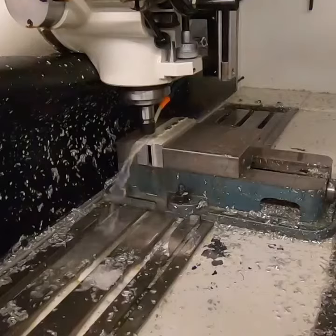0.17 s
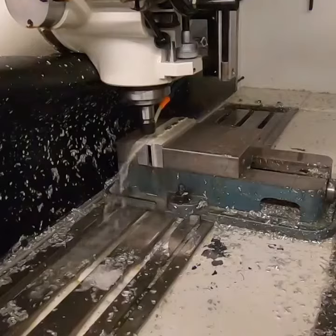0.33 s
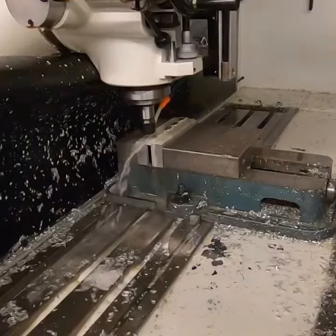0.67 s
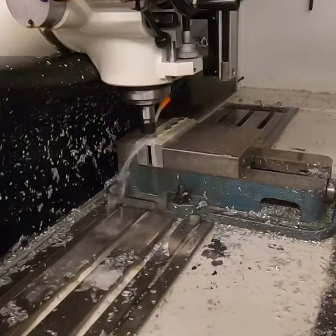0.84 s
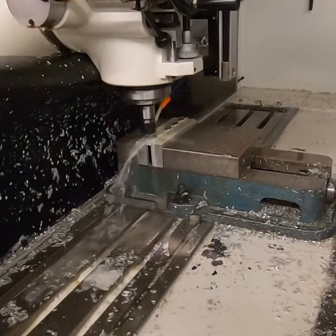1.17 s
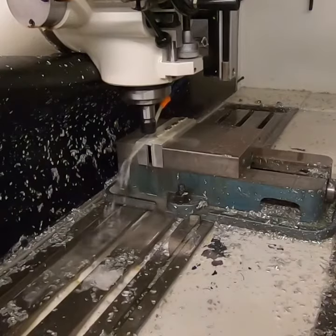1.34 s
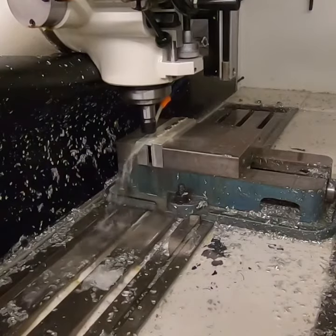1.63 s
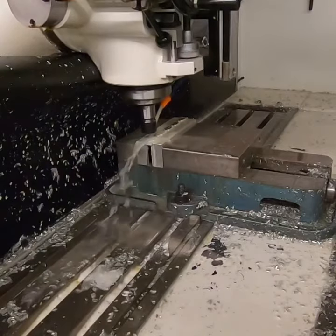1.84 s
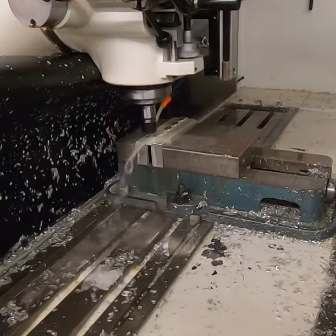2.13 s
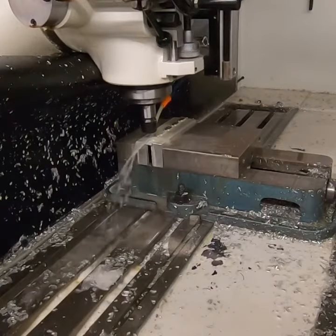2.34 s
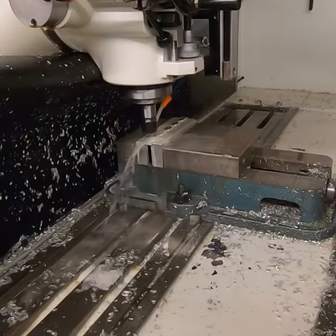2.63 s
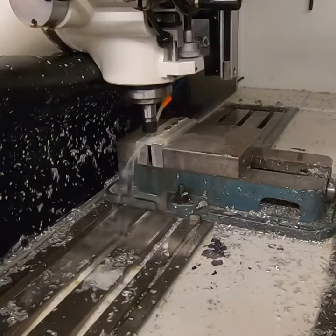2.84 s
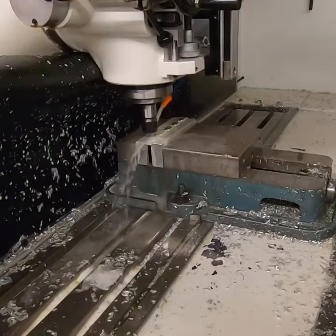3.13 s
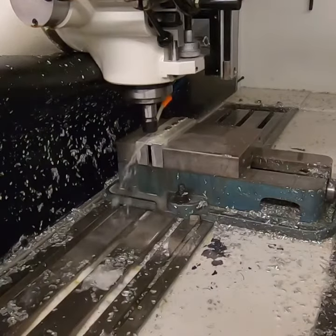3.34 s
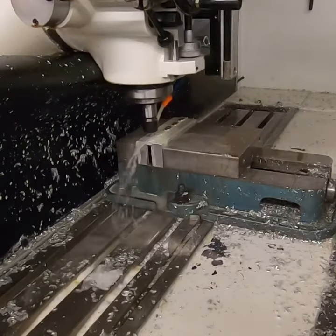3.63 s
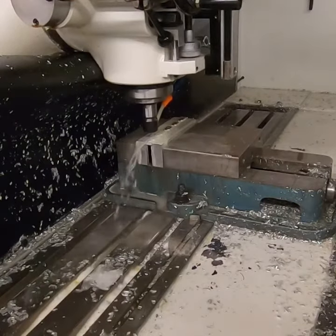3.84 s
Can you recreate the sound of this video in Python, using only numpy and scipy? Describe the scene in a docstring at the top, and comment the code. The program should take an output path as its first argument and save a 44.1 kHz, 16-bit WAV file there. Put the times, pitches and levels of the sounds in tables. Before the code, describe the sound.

A milling machine runs with a low, swelling drone and a steady whine.

```python
"""A low, swelling drone fades in quickly: a milling machine running in its steel enclosure.
The coolant pump's vanes make the drone, and the turning spindle adds a singing overtone.
Motors and bearings whine in many slightly wavering tones over the hum and rumble of the panels,
which boom softly now and then. Coolant runs off the vice with a faint hiss."""
import sys
import numpy as np
from scipy import signal
from scipy.fft import rfft, irfft
from scipy.io import wavfile

SR = 44100
rng = np.random.default_rng(int(sys.argv[2]) if len(sys.argv) > 2 else 0)


def generate_wav(sig):
    """Save sig (samples, or channels by samples) to the path in sys.argv[1] as 16-bit PCM at SR."""
    pcm = np.round(np.clip(np.atleast_2d(sig).T, -1, 1) * 32767).astype(np.int16)
    wavfile.write(sys.argv[1], SR, pcm)


N = 176400


def pump():
    """The pump's vanes drone, swelling and sinking, over its shaft tones."""
    # swell of the vane drone (time [s], level [dB])
    drone_level = [(.3, -38), (.75, -34.8), (1.18, -35.5), (1.6, -34.3), (2.0, -38.5), (2.25, -41),
                   (2.44, -45), (2.6, -38.5), (2.76, -48), (3.05, -33.3), (3.31, -29.5), (3.42, -40),
                   (3.52, -40), (3.56, -32.3), (3.72, -33.3), (3.84, -38), (4, -35.5)]
    # shaft tones (multiple of the turning rate, level [dB])
    shaft_tones = [(1, -54), (10, -59.5)]
    turn_hz, drone_order = 59.15, 5
    drone = tone(drone_order * turn_hz, curve(drone_level), flutter=0.09, flutter_hz=3.4)
    shaft = sum(tone(order * turn_hz, db, flutter=0.076, flutter_hz=0.86) for order, db in shaft_tones)
    return drone + shaft


def spindle():
    """The spindle holds its speed exactly: low tones, one singing overtone and a thin, high whistle."""
    # low spindle tones (multiple of the turning rate, level [dB])
    low_tones = [(1, -57.5), (3, -41)]
    # swell of the singing overtone (time [s], level [dB])
    sing_level = [(.3, -43.5), (1.4, -42.5), (2.0, -47.5), (2.5, -44.5), (3.05, -51), (3.35, -45.5),
                  (3.8, -51), (4, -57)]
    # whistle tones (multiple of the turning rate, level [dB])
    high_tones = [(115, -98), (117, -90.5), (119, -103), (121, -101.5), (123, -97)]
    turn_hz, sing_order = 66.665, 6
    sing = tone(sing_order * turn_hz, curve(sing_level), flutter=0.03, flutter_hz=5)
    whistle = sum(tone(order * turn_hz, db, flutter=0.08, flutter_hz=8) for order, db in high_tones)
    body = sum(tone(order * turn_hz, db, flutter=0.28, flutter_hz=6.3) for order, db in low_tones)
    return sing + whistle + body


def enclosure():
    """The steel panels hum and rumble, and now and then boom softly."""
    # low hum of motors and panels (pitch [Hz], level before the swell [dB])
    hum_tones = [(33.5, -59), (101.6, -50), (105.3, -59.5), (109.9, -53), (119.6, -44), (152.9, -55),
                 (166.7, -51), (171.2, -51), (176, -47), (216, -40), (233.7, -51.5), (237.8, -43),
                 (304.6, -49), (329.6, -55), (338, -63), (408.7, -53.5), (414.3, -60), (495.1, -63.5),
                 (500.4, -59.5), (509, -60.5)]
    # swell of the hum (time [s], gain [dB])
    hum_swell = [(.3, -4.5), (.55, -2.5), (.8, 0.5), (2.1, 0.5), (3.3, 0.5), (4, -0.5)]
    # panel rumble (frequency [Hz], level before the swell [dB per Hz])
    rumble_spectrum = [(10, -81), (33, -66.5), (45, -71.5), (58, -62), (82, -72.5), (125, -68), (170, -57),
                       (235, -58), (275, -64.5), (300, -57), (350, -74), (385, -78.5), (410, -70.5),
                       (445, -78), (505, -72), (580, -82)]
    # swell of the rumble (time [s], gain [dB])
    rumble_swell = [(.3, 1.5), (.6, 2), (.8, -1), (1.45, 0), (1.8, -1), (2.7, -1), (3.05, -1), (3.4, 5),
                    (3.7, 0), (4, 1.5)]
    # panel booms (time [s], pitch [Hz], level at the crest [dB], half length [s])
    booms = [(.386, 200, -28.5, .008), (.511, 200, -27.5, .009), (.538, 205, -27, .004),
             (.632, 185, -24.5, .004), (1.085, 211, -29, .007), (2.097, 187, -27, .004),
             (3.43, 235, -28.5, .01), (3.543, 250, -24.5, .022), (3.748, 214, -27, .004),
             (3.936, 220, -28, .011)]
    hum = sum(tone(hz, db, flutter=0.27, flutter_hz=2.8) for hz, db in hum_tones)
    rumble = noise(rumble_spectrum, ripple_db=2.5, ripple_hz=5)
    panels = amp(curve(hum_swell)) * hum + amp(curve(rumble_swell)) * rumble
    for at, hz, db, half_length in booms:
        envelope = np.exp(-((clock() - at) / half_length) ** 2)
        panels += tone(hz, db, flutter=0.04, flutter_hz=30) * envelope
    return panels


def drive():
    """The drive's whine and the throbbing bearings share one slight wander in speed, over a whirr."""
    # whine of the drive (pitch [Hz], level before the swell [dB])
    whine = [(625.8, -67.5), (681.3, -66), (714.8, -59), (733.8, -52), (748.1, -59.5), (752.4, -65.5),
             (781.5, -55.5), (834.3, -61.5), (901.2, -68), (906.3, -57), (917.9, -71.5), (934.5, -70),
             (1020, -67), (1030.5, -58.5), (1038.7, -58), (1057.6, -56.5), (1072.1, -54), (1077.7, -67.5),
             (1086.8, -63.5), (1136, -62.5), (1143.1, -70), (1150.5, -72), (1237.1, -58), (1243.9, -69),
             (1298.7, -70), (1304.7, -67), (1316.9, -68.5), (1333.2, -71.5), (1396.1, -60), (1452.4, -61),
             (1462.9, -60.5), (1481.6, -54.5), (1500.6, -69.5), (1631.1, -66), (1674.8, -66.5), (1704, -64),
             (1726.1, -61.5), (1753.5, -46), (1782.7, -69.5), (1820.2, -56.5), (1828.8, -73.5),
             (1839.1, -59.5), (1941.5, -62.5), (1970, -80.5)]
    # thin metallic overtones of the head (pitch [Hz], level before the swell [dB])
    overtones = [(2110.9, -85), (2177.5, -87), (2199, -79), (2374, -91), (2502, -92), (2536, -78),
                 (2543.6, -87), (2553, -86), (2675.5, -75.5), (2702.8, -90), (2709, -85.5), (2767, -79),
                 (2796.5, -88), (2811, -83), (2825.6, -85.5), (2859, -84), (2881, -80.5), (2905, -88),
                 (2919.6, -89), (2950, -85), (3073.5, -85), (3183, -90), (3202, -91), (3251, -90),
                 (3607, -85)]
    # bearing tones (multiple of the ball-pass rate, level before the swell [dB],
    # throb depth [dB], throb rate [Hz], time of a crest [s])
    bearing_tones = [(3, -50.7, 2.1, 4.18, 1.15), (4, -47.6, 5.0, 1.28, 1.17), (5, -62.5, 1.2, 4.1, 1.1),
                     (6, -61.5, 1.2, 1.3, 1.2), (7, -67.5, 1.2, 4.1, 1.2), (8, -74, 1.2, 1.3, 1.1)]
    # bearing whirr in the head casting (frequency [Hz], level before trim and swell [dB per Hz])
    whirr_spectrum = [(630, -74.5), (720, -74), (860, -79.5), (905, -73.5), (980, -83), (1080, -79),
                      (1180, -80.5), (1310, -81.5), (1500, -85.5), (1585, -96), (1650, -84), (1760, -78),
                      (1890, -95.5), (2180, -93), (2280, -106), (2500, -105), (2850, -96.5), (3000, -103)]
    # swell of the whole drive (time [s], gain [dB])
    swell = [(.3, -3.5), (.65, -1.6), (1.1, -0.5), (2.6, -0.5), (4, -.5)]
    ball_pass_hz, whirr_trim_db = 276.72, 0.32
    wander = 0.00011 * drift(0.56)  # as a fraction of the speed
    tones = sum(tone(hz, db, flutter=0.02, flutter_hz=9.5, wander_hz=hz * wander)
                for hz, db in whine + overtones)
    for order, db, throb_db, throb_hz, crest in bearing_tones:
        hz = order * ball_pass_hz
        throb = throb_db * np.cos(2 * np.pi * throb_hz * (clock() - crest))
        tones += tone(hz, db + throb, flutter=0.059, flutter_hz=4.3, wander_hz=hz * wander)
    whirr = amp(whirr_trim_db) * noise(whirr_spectrum, ripple_db=4, ripple_hz=2)
    return amp(curve(swell)) * (tones + whirr)


def coolant():
    """Running coolant hisses softly, lifted for an instant by each small splash."""
    # coolant hiss (frequency [Hz], level before the swell [dB per Hz])
    hiss_spectrum = [(2300, -104), (3300, -100.3), (4000, -104.7), (4800, -110), (6000, -112),
                     (7200, -117.6), (8800, -120.4), (9600, -126), (10300, -135.8)]
    # swell of the hiss (time [s], gain [dB])
    swell = [(.3, -4.5), (.75, -2), (1.15, -1), (2.6, -0.3), (4, -1)]
    drops_per_s, decay_s, splash_depth = 270, 0.0016, 0.14
    drop_onsets = rng.random(N) < drops_per_s / SR
    drops = drop_onsets * np.minimum(rng.exponential(1, N), 3)
    splashes = 1 + splash_depth * signal.lfilter([1], [1, -np.exp(-1 / (decay_s * SR))], drops)
    hiss = noise(hiss_spectrum, ripple_db=2.5, ripple_hz=9.9)
    return amp(curve(swell)) * hiss * splashes / np.sqrt(np.mean(splashes ** 2))


def tone(hz, db, flutter, flutter_hz, wander_hz=0):
    """A sine at an RMS level of db that flutters in strength and phase, and may wander in pitch."""
    phase = 2 * np.pi * (hz * clock() + np.cumsum(wander_hz * np.ones(N)) / SR + rng.random())
    strength = 1 + flutter * drift(flutter_hz)
    phase_wobble = flutter * drift(flutter_hz)
    return np.sqrt(2) * amp(db) * (strength * np.sin(phase) + phase_wobble * np.cos(phase))


def noise(spectrum, ripple_db, ripple_hz, skirt_db=150):
    """Shaped noise, rippled by narrow resonances; past the spectrum's ends it falls skirt_db an octave."""
    hz = np.fft.rfftfreq(N, 1 / SR) + 1
    points_hz, db = np.transpose(spectrum)
    octaves_outside = abs(np.log2(hz / np.clip(hz, points_hz.min(), points_hz.max())))
    level = np.interp(np.log(hz), np.log(np.sort(points_hz)), db) - skirt_db * octaves_outside
    bumps = np.interp(hz / ripple_hz, np.arange(len(hz)), rng.standard_normal(len(hz)))
    ripple = amp(ripple_db * np.clip(bumps, -2, 2))
    ripple /= np.sqrt(np.mean(ripple ** 2))
    return irfft(rfft(rng.standard_normal(N)) * amp(level) * ripple, N) * np.sqrt(SR / 2)


def drift(rate_hz):
    """Slow random motion of unit size, up to about rate_hz."""
    t = np.linspace(0, N / SR, num=800)
    hz = np.fft.rfftfreq(2 * len(t), t[1])
    white = rfft(rng.standard_normal(2 * len(t)))
    slow = irfft(white / np.sqrt(1 + (hz / rate_hz) ** 4))[:len(t)]
    return np.interp(clock(), t, (slow - slow.mean()) / slow.std())


def curve(points):
    """A control curve, read at every sample."""
    return np.interp(clock(), *np.transpose(points))


def amp(db):
    """Decibels to gain."""
    return 10 ** (np.asarray(db) / 20)


def clock():
    """Time of every sample in seconds."""
    return np.arange(N) / SR


def scene():
    """All parts of the machine in mono, heard from inside the enclosure."""
    return (spindle() + pump() + drive() + enclosure() + coolant())[None]


def record(dry):
    """A moment of silence and a quick fade-in, with the top treble cut away."""
    fade_start_s, fade_length_s, cutoff_hz = 0.26, 0.073, 10800
    fade = np.clip((clock() - fade_start_s) / fade_length_s, 0, 1) ** 1.87
    low_pass = signal.firwin(511, cutoff_hz, window=("kaiser", 9), fs=SR)
    return signal.oaconvolve(dry * fade, low_pass[None], "same")


dry = scene()
out = record(dry)
generate_wav(out)
```